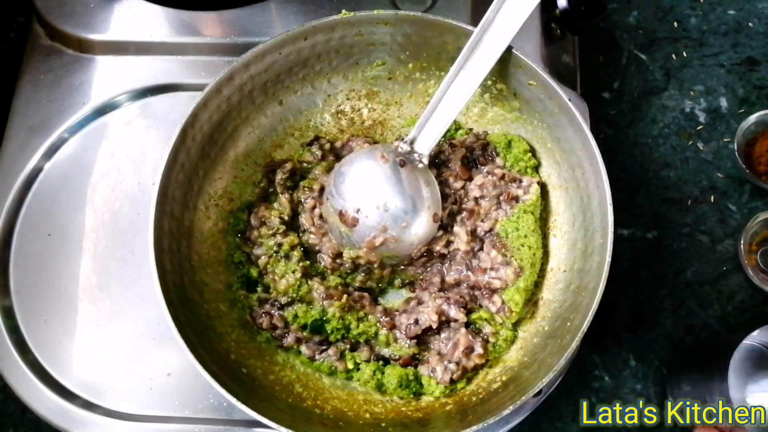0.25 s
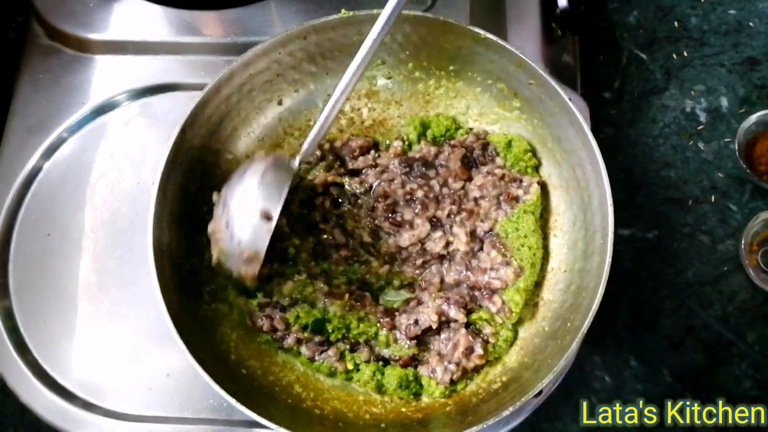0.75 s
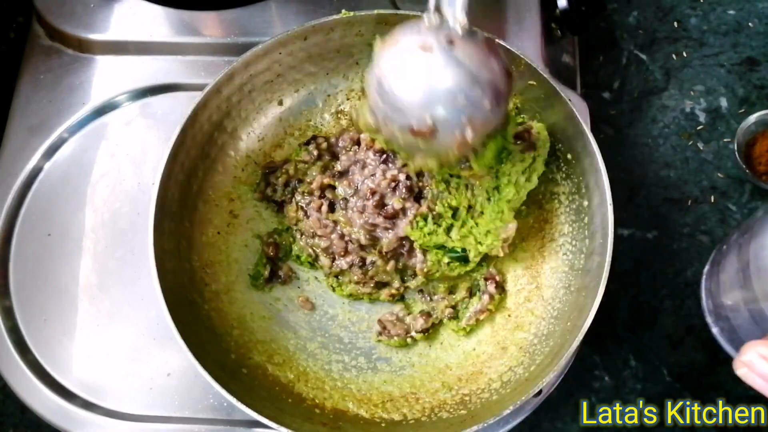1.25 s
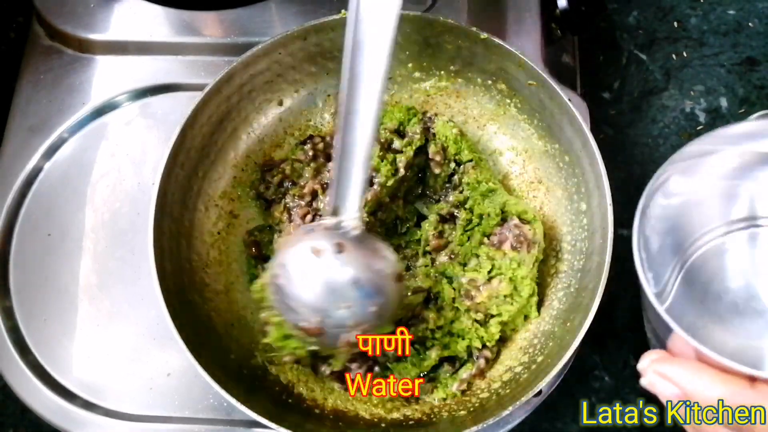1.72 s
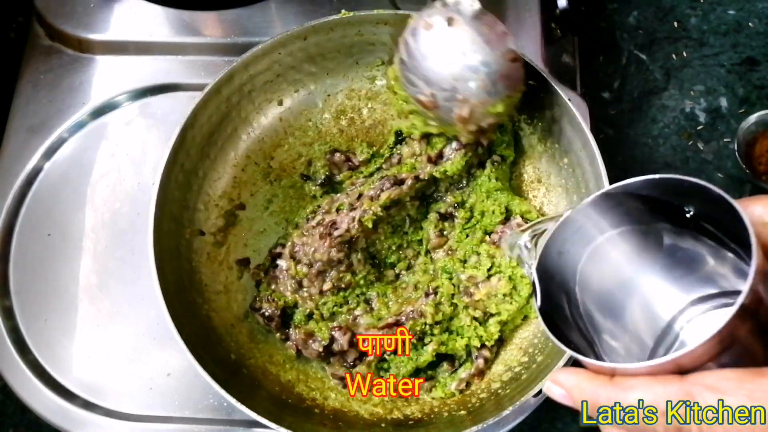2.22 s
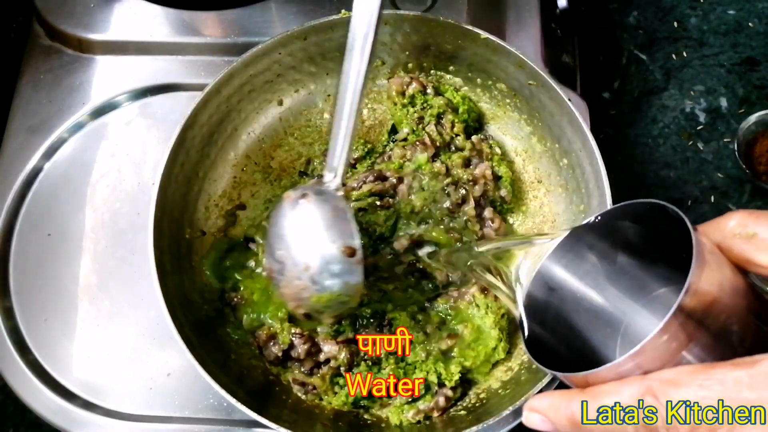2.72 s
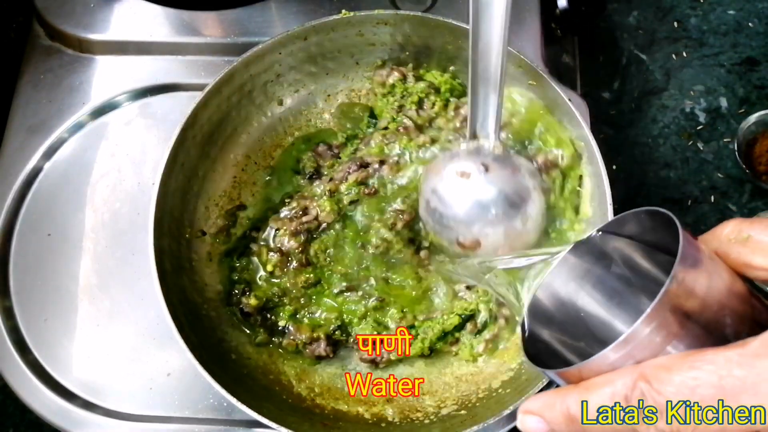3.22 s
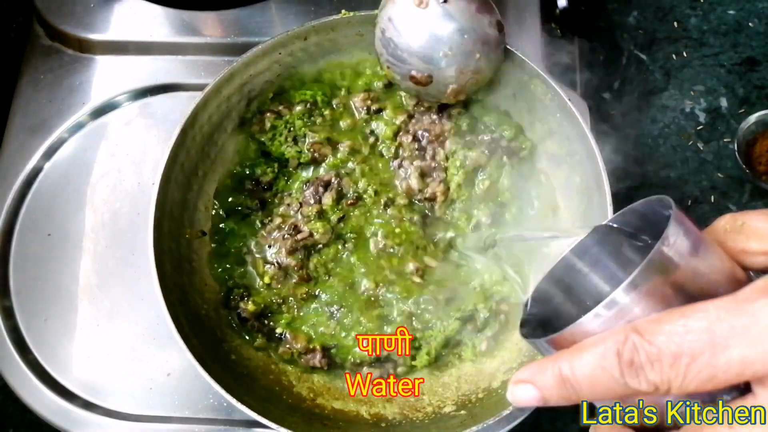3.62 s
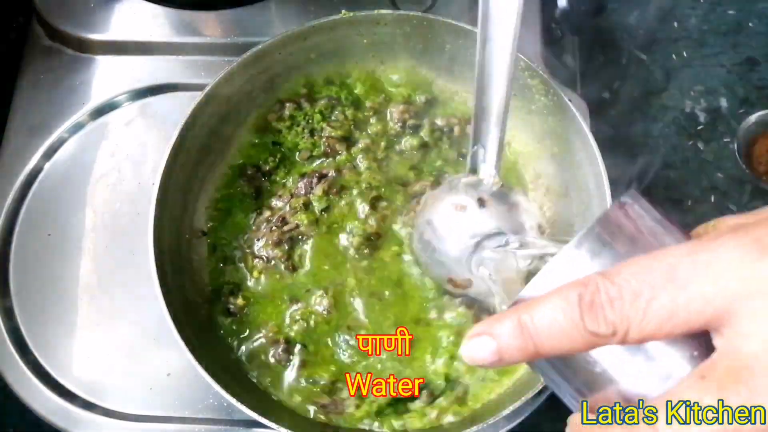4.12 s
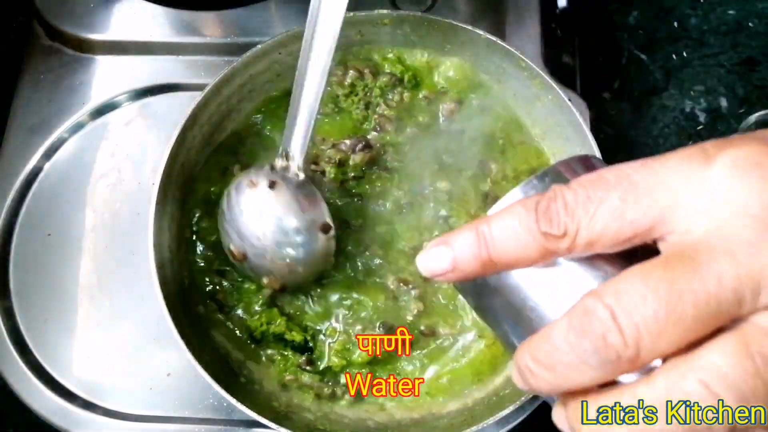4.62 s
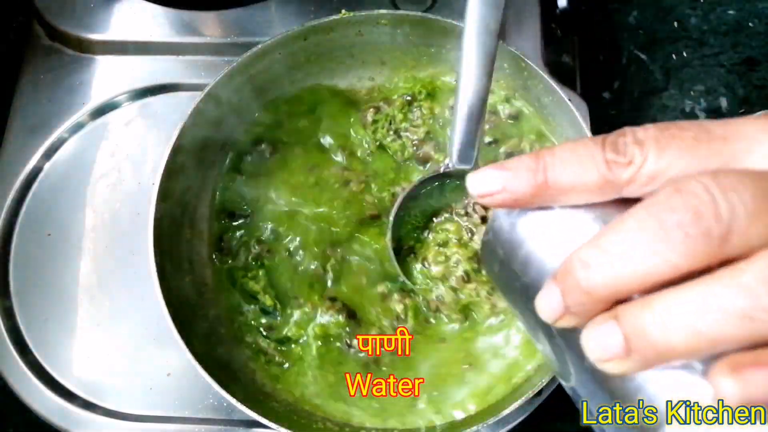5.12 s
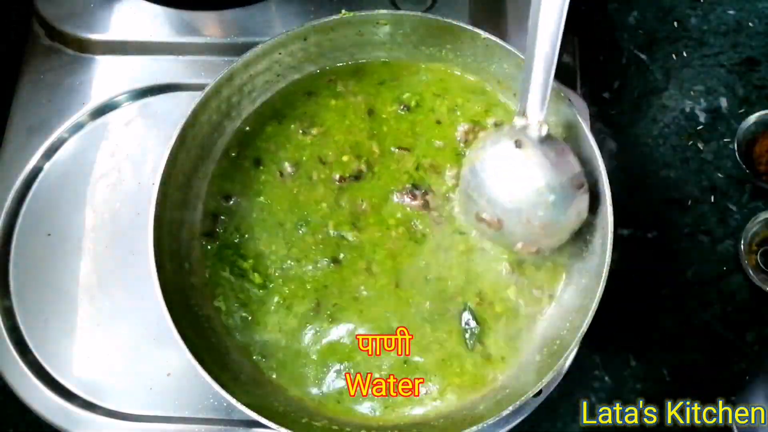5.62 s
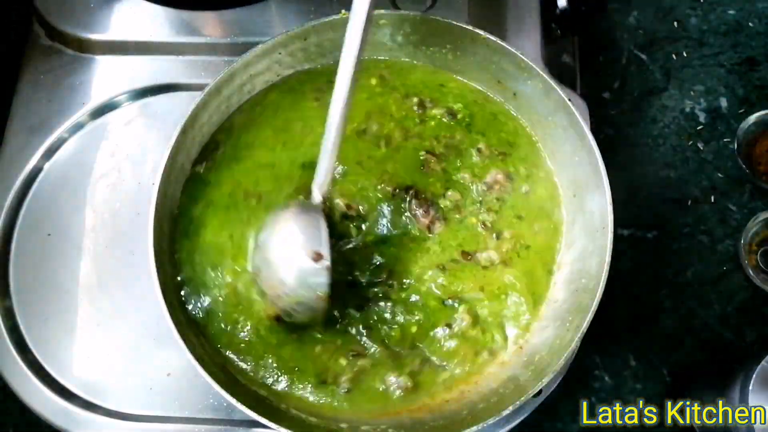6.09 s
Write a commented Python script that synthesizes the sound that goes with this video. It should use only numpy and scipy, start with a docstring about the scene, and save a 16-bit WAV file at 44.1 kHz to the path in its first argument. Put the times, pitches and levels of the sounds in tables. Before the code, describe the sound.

Food sizzles and spits in a metal pan over a low flame, then poured water makes the hiss surge and bubble, with a steel clang.

```python
"""Dal fries in a metal pan over a rumbling gas flame: filtered noise for the flame, random clicks for steam bursts.
From the start a ladle squelches through the paste and oil spits in short snaps; soon knocks ring the pan's
damped modes and pushes set it booming. From about 2.5 s water is poured in from a steel tumbler: bubbles boil
as decaying sines and seethe as the water spreads, and it smothers the steady fizz. Near 3.7 s air pockets plop
and steel clangs on steel, as fluttering modes over a noise crash; flares of fizz continue to the end."""
import sys
import numpy as np
from scipy import signal
from scipy.fft import rfft, irfft, next_fast_len
from scipy.io import wavfile

SR = 44100
rng = np.random.default_rng(int(sys.argv[2]) if len(sys.argv) > 2 else 0)


def master_out(mix):
    """Clip the mix to full scale and print it as 16-bit PCM to the path in sys.argv[1]."""
    frames = np.transpose(np.atleast_2d(mix))
    ceiling = np.clip(frames, -1, 1)
    pcm = np.round(ceiling * 32767).astype(np.int16)
    wavfile.write(sys.argv[1], SR, pcm)


N = 280023

# Relative spectrum of the gas flame's deep rumble and of its soft roar. Columns: f/Hz, level/dB
FLAME_LOW_SPECTRUM = [(12, -10), (22, -3), (33, 4), (48, -7), (61, -2), (80, -16), (130, -27.5)]
FLAME_ROAR_SPECTRUM = [(80, -8), (115, 2), (160, -4), (205, -17.5), (400, -33), (900, -59)]
ROAR_DB = -56
# Strength of the flame's rumble. Columns: t/s, level/dB
RUMBLE_LEVEL = [(0, -50.5), (1.35, -48.5), (1.6, -55), (2.3, -47.5), (2.8, -59), (3.4, -54), (4.8, -55.5),
                (5.6, -52), (6.35, -52)]
# Strength of a low hum that soon fades. Columns: t/s, level/dB
HUM_LEVEL = [(0, -55), (0.6, -57), (0.9, -58.5), (1.1, -84)]
HUM_HZ = 159   # mean pitch

# Relative spectrum of the fizz on each side. Columns: f/Hz, left level/dB, right level/dB
FIZZ_SPECTRUM = [(2100, -25, -23.5), (3180, -15.3, -14.5), (3550, -15.5, -17), (4530, -13, -10.5),
                 (5510, -9.5, -2), (6280, -6.5, 3.5), (6800, -3.5, -5.5), (7840, 1.5, -3),
                 (8300, 0.5, -10.5), (9940, -9, -8.5), (10680, -8, -11.5), (13200, -18, -11),
                 (14150, -11, -10.5), (15600, -21.5, -7)]
# Steam bursts at a middling fizz, sparse while only oil is frying. Columns: t/s, rate/(bursts per s)
BURST_RATE = [(0, 770), (0.6, 1270), (1.1, 3200), (2.2, 3300), (3.4, 4400), (4.6, 13000), (6.35, 12500)]
# Flares, when wet food or water reaches bare hot metal. Columns: t/s, fizz level/dB, rise/s,
# time the metal stays wet/s, then relative to the fizz: coarse droplets/dB, fine spray/dB, boiling/dB;
# last, left-right difference/dB
FRYING_FLARES = [(0.0, -32, 0.0039, 0.22, -5, -7, -14.5, -2.5),
                 (0.375, -34.5, 0.038, 0.049, 1, -16, -16, 2), (0.79, -34.5, 0.1, 0.13, 0, -8.5, -12, -1),
                 (1.0, -24, 0.15, 0.13, 2, -6.5, -19.5, 0),
                 (1.44, -27.5, 0.042, 0.17, -1.5, -7.5, -19.5, 2), (1.93, -25, 0.14, 1, -1.5, -8, -19.5, 1),
                 (2.595, -25, 0.05, 0.3, 5, -6, -20, 1.5), (3.1, -21.5, 0.058, 0.41, 6, -6, -14.5, 0.5),
                 (3.21, -17.5, 0.054, 0.45, -1, -15, -22, 1), (3.58, -22.5, 0.11, 0.15, 4.5, -12, -25, -4),
                 (3.93, -27, 0.088, 0.19, 4.5, -10.5, -10.5, -0.5),
                 (4.12, -21.5, 0.17, 0.23, 0, -9, -31, 1), (4.65, -33, 0.1, 0.15, 5.5, -9.5, -15.5, 0),
                 (5.086, -23, 0.14, 0.044, 2, -10, -19.5, 0.5),
                 (5.54, -35.5, 0.02, 0.046, 2.5, -12, -23, -5.5),
                 (5.85, -28, 0.13, 0.11, 3.5, -8.5, -17.5, 0),
                 (6.19, -26.5, 0.096, .1, -2.5, -12, -14.5, -0.5)]
# a flare sags while the metal is wet, then dies quickly as it dries
SAG_DB_PER_S, DRYING_DB_PER_S = 0.5, 40.5
# steady fizz between flares and steady simmer of larger bubbles, in bare oil and under water
OIL_FIZZ_DB, COVERED_FIZZ_DB = -32.5, -52
OIL_SIMMER_DB, COVERED_SIMMER_DB = -48.5, -51
# coarse droplets and fine spray of the steady frying, relative to its fizz
STEADY_COARSE_DB, STEADY_SPRAY_DB = 0.5, -9
# the water gradually covers the pan's floor between these moments
COVER_FROM_S, COVER_BY_S = 2.5, 4.4
# How hard the poured water churns and boils. Columns: t/s, level/dB
WATER_LEVEL = [(2.45, -69), (2.66, -38.5), (3.08, -46), (3.4, -34.5), (3.62, -33), (3.85, -32.5),
               (4.1, -40), (4.55, -37.5), (4.9, -46), (5.13, -55), (5.2, -44), (5.38, -43.5), (5.46, -67)]

# Relative spectrum of the boiling, with the pan's resonances standing out. Columns: f/Hz, level/dB
BOILING_SPECTRUM = [(350, -11), (620, -13.5), (840, 1), (980, -3), (1120, -2), (1280, -3), (1540, 0.5),
                    (1730, 5.5), (1930, -0.5), (2230, 4.5), (2650, -9), (4000, -5)]
# Relative spectrum of the squelching paste. Columns: f/Hz, level/dB
SQUELCH_SPECTRUM = [(150, 1.5), (220, -2.5), (300, 0.5), (400, -5), (550, 2.5), (750, -3.5), (1300, -19.5)]
# squelch under the moving ladle, relative to the water's churning, and relative to a knock
STIR_DB, GURGLE_DB, SMACK_DB = -59, -14, -17.5
SMACK_RISE_S, SMACK_DB_PER_S = 0.01, 70

# Oil spits, levels before the low cut. Columns: t/s, peak level/dB, left-right difference/dB, snap width/s
OIL_SPITS = [(0.0782, -13, -1, 0.00016), (0.1135, -11, -2, .00012), (0.131, -19, -1, 0.000044),
             (0.162, -18, 0, .00005), (0.1685, -20, 1, .00015), (0.1938, -0.5, 2, 0.00017),
             (0.2516, -9.5, -1, .00008), (0.3066, -5, 5, 0.00013), (0.3530, -10, 0, 0.000056),
             (0.423, -9, 4, 0.00015), (0.4592, -13.5, 3, 0.00016), (0.516, -14.5, 1, .00017),
             (0.5625, -13.5, 14, 0.00019), (0.944, -18, 6, .00006), (1.0055, -15, 9, 0.00017),
             (1.962, -11, -2, 0.00013), (2.0567, -21, -3, 0.000082), (2.7375, -7, 7, 0.00017),
             (2.9755, -14.5, 0, 0.0001), (3.105, -16, -1, .00012)]
SPRAY_TICK_S = 0.000083
# Pushes that rock the pan on its stand. Columns: t/s, level/dB
PAN_PUSHES = [(0.454, -38), (0.965, -40), (1.137, -34), (1.642, -40.5), (2.402, -43), (3.22, -34),
              (3.736, -27.5), (3.821, -43), (4.04, -31.5), (4.341, -33.5), (4.437, -32), (5.02, -45),
              (5.77, -35.5), (5.869, -34), (6.021, -32.5)]
BOOM_HZ, BOOM_T60_S = 94.2, 0.65
# Knocks of the ladle on the pan through the paste. Columns: t/s, level/dB
LADLE_KNOCKS = [(0.457, -34), (0.974, -36), (1.023, -30.5), (1.120, -31.5), (1.645, -34.5), (1.675, -41),
                (2.39, -38)]
# The pan's modes, damped by the dal. Columns: f/Hz, level relative to the knock/dB, t60/s
PAN_MODES = [(293, -15, 0.13), (410, -11, 0.043), (528, -39, 0.049), (810, -3, 0.012), (1270, -12, .03),
             (1720, -20, 0.018)]
# Short crackling spurts of steam. Columns: t/s, level/dB, length/s, centre f/Hz
STEAM_SPURTS = [(0.738, -30, 0.02, 6900), (2.052, -26, 0.021, 6850), (3.140, -22, .024, 5930),
                (3.160, -20.5, 0.019, 6260), (3.208, -19.5, 0.032, 5600), (3.258, -25, 0.021, 7240),
                (3.305, -17, 0.035, 7440), (4.156, -23, .014, 7000), (4.248, -18.5, 0.018, 6950),
                (4.278, -27, .018, 7200), (4.323, -18, 0.013, 7500), (4.350, -22, .02, 7400),
                (4.406, -20.5, 0.017, 7100), (4.435, -21, 0.032, 7750)]
# Scrapes of the ladle's edge on the pan. Columns: t/s, level/dB, length/s, centre f/Hz
LADLE_SCRAPES = [(0.865, -46, 0.14, 2040), (1.016, -40, 0.019, 1750), (1.93, -46, 0.4, 1490),
                 (3.345, -34, 0.073, 1750), (3.79, -34.5, 0.099, 1250), (5.14, -39.5, 0.21, 2040)]

# Relative spectrum of fine bubbles in the layer of water. Columns: f/Hz, level/dB
SEETHING_SPECTRUM = [(480, -4.5), (850, -6), (1050, -14), (1350, -2), (1580, -1), (1760, -5), (2000, -1),
                     (3000, -7.5), (5000, 4), (8000, -13)]
SEETHING_DB = -4.5   # relative to the boiling
# Plops of water. Columns: t/s, peak level/dB, f/Hz
WATER_PLOPS = [(3.674, -24, 1860), (3.8377, -14, 1310)]
PLOP_SWELL_S = .0009
# Steel touches steel, strikes it and skids. Columns: t/s, crash level/dB
STEEL_CLANGS = [(3.695, -15.5), (3.708, -15.5), (3.739, -25), (3.766, -25)]
# Modes of the steel before flutter. Columns: f/Hz, peak level/dB, swell time/s, t60/s, left-right difference/dB
STEEL_MODES = [(1753, -25.5, .050, .3, 4), (2250, -28.5, .008, .13, 0), (2923, -36, .03, .2, 0),
               (4415, -30, .02, .3, -4), (5217, -16, .05, .24, -6), (6110, -18.5, .005, .28, -8),
               (7075, -14.5, .022, .55, -7), (7644, -16.5, .006, .24, 9), (8110, -20, .006, .27, 10),
               (9215, -15.5, .010, .19, 4), (9620, -25, .035, .2, 5), (10017, -23.5, .012, .27, 5),
               (10405, -24, .045, .22, 3), (10471, -25, .02, .22, 3), (11620, -28, .03, .14, -4),
               (12385, -24.5, .028, .15, -1), (12610, -26, .015, .12, -2), (12973, -27, .03, .18, -4),
               (13193, -26, .008, .2, -4), (14099, -25.5, .02, .18, -8), (15073, -28, .06, .08, -6)]
SKID_FROM_S = 3.707   # the modes are pumped from the main strike on
CUTOFF_HZ = 15700


def from_db(db):
    """Amplitude ratio of a level in decibels."""
    return 10 ** (np.asarray(db) / 20)


def power_sum(*levels_db):
    """Incoherent addition: the powers of independent sounds add."""
    return 10 * np.log10(sum(10 ** (db / 10) for db in levels_db))


def rms_one(x):
    """Normalisation to unit root-mean-square amplitude."""
    return x / np.sqrt(np.mean(x ** 2) + 1e-20)


def in_time(rows):
    """Linear interpolation of each column of a curve, sample by sample."""
    s, *columns = np.transpose(rows)
    return [np.interp(np.arange(N) / SR, s, c) for c in columns]


def drift(rate, size=N):
    """Low-passed random fluctuation of unit spread, with its corner near `rate` in Hz."""
    # a double pole, run at one value per 40 samples
    r = np.exp(-80 * np.pi * rate / SR)
    steps = rng.standard_normal(size // 40 + 2002)
    slow = signal.lfilter([1], [1, -2 * r, r * r], steps)[2000:]   # skip the onset
    return np.interp(np.arange(size) / 40, np.arange(len(slow)), rms_one(slow))


def swell(s, rise_s, hold_s, sag, release):
    """Envelope in dB: a linear rise in amplitude, a sagging hold, then a release (both in dB per s)."""
    t = np.arange(N) / SR - s
    held = np.maximum(t - rise_s, 0)
    rise = np.clip(t / rise_s, 1e-6, 1)
    return 20 * np.log10(rise) - sag * np.minimum(held, hold_s) - release * np.maximum(held - hold_s, 0)


def place(s, sound):
    """Delay: a short sound set at its moment."""
    out, at = np.zeros(N), round(s * SR)
    out[at:at + len(sound)] = sound[:N - at]
    return out


def grains(per_s, spread_db):
    """Random (Poisson-like) clicks of either sign, with an exponential spread of level in dB."""
    out, at = np.zeros(N), np.flatnonzero(rng.random(N) < per_s / SR)
    depth = rng.exponential(1, N)[at]
    sign = rng.choice([-1, 1], N)[at]
    out[at] = sign * from_db(spread_db * np.minimum(depth, 5))
    return out


def stereo_noise(alike):
    """Partly correlated white noise: the power share `alike` is common to both sides."""
    alike = np.clip(alike, 0, 1)
    common = rng.standard_normal(N)
    separate = rng.standard_normal((2, N))
    return np.sqrt(alike) * common + np.sqrt(1 - alike) * separate


def colour(x, spectrum):
    """Spectral shaping by rows of f/Hz and one or two levels/dB; 12 dB per octave fall below the first."""
    size = next_fast_len(N + SR // 4)
    hz = np.maximum(np.arange(size // 2 + 1) * SR / size, 1)
    points, *columns = np.transpose(spectrum)
    gain = from_db([np.interp(np.log(hz), np.log(points), c) for c in columns])
    gain = gain * np.minimum(hz / points[0], 1) ** 2
    return irfft(rfft(x, size) * gain, size)[:, :N]


def ring(clicks, hz, t60):
    """Two-pole resonator: a unit click excites a decaying sine of initial height 1."""
    r, w = from_db(-60 / (t60 * SR)), 2 * np.pi * hz / SR
    return signal.lfilter([0, np.sin(w)], [1, -2 * r * np.cos(w), r * r], clicks + 1e-18)


def bowl(x, scatter_db, t60):
    """Diffuse scattering: the pan's walls add a short decaying tail, different on each side."""
    t = np.arange(SR // 8) / SR
    tail = rng.standard_normal((2, len(t))) * from_db(-60 * t / t60)
    tail /= np.sqrt(np.sum(tail ** 2, axis=1, keepdims=True))
    scattered = signal.fftconvolve(np.atleast_2d(x), tail, axes=1)[:, :N]
    return x + from_db(scatter_db) * scattered


def stove():
    """Combustion noise: the flame's deep rumble and steady soft roar, with a wavering tonal hum."""
    rumble_db, = in_time(RUMBLE_LEVEL)
    hum_db, = in_time(HUM_LEVEL)
    hum_pitch = HUM_HZ + 3 * drift(4.6)
    hum = np.sqrt(2) * np.sin(2 * np.pi * np.cumsum(hum_pitch) / SR)
    rumble = from_db(rumble_db) * rms_one(colour(stereo_noise(alike=0.96), FLAME_LOW_SPECTRUM))
    roar = from_db(ROAR_DB) * rms_one(colour(stereo_noise(alike=0.98), FLAME_ROAR_SPECTRUM))
    return rumble + roar + from_db(hum_db + 2.0 * drift(3.8)) * hum


def water_cover():
    """Spreading layer: the share of the pan's floor under water grows linearly."""
    return np.clip((np.arange(N) / SR - COVER_FROM_S) / (COVER_BY_S - COVER_FROM_S), 0, 1)


def frying_levels(water_db):
    """Power balance of flares and steady frying, whose fizz the water smothers as it spreads.

    Returns the levels of fizz, coarse droplets, fine spray and boiling, and the left-right difference, in dB.
    """
    cover = water_cover()
    steady_db = OIL_FIZZ_DB + cover * (COVERED_FIZZ_DB - OIL_FIZZ_DB)
    simmer_db = OIL_SIMMER_DB + cover * (COVERED_SIMMER_DB - OIL_SIMMER_DB)
    flares_db = [db + swell(s, rise_s, wet_s, SAG_DB_PER_S, DRYING_DB_PER_S)
                 for s, db, rise_s, wet_s, *_ in FRYING_FLARES]
    powers = from_db(flares_db) ** 2
    *_, coarse, sprays, boils, pans = np.transpose(FRYING_FLARES)
    shares = from_db([np.zeros(len(FRYING_FLARES)), coarse, sprays, boils]) ** 2
    fizz_db, coarse_db, spray_db, boil_db = 10 * np.log10(shares @ powers)
    # the steady frying is centred, so it dilutes the flares' balance
    pan_db = pans @ powers / (powers.sum(axis=0) + from_db(steady_db) ** 2)
    return (power_sum(steady_db, fizz_db),
            power_sum(steady_db + STEADY_COARSE_DB, coarse_db),
            power_sum(steady_db + STEADY_SPRAY_DB, spray_db),
            power_sum(simmer_db, water_db, boil_db),
            pan_db)


def fizz(fizz_db, coarse_db, spray_db):
    """Impulsive steam noise: the harder the frying, the denser the bursts, merging into a hiss."""
    per_s = in_time(BURST_RATE)[0] * from_db(.5 * (fizz_db + 30.0) + 1.9 * drift(25))
    left = rms_one(grains(per_s, spread_db=2.0) / np.sqrt(per_s))
    # bursts come from all over the pan, so each reaches the right side with a lag of its own
    at, right = np.flatnonzero(left), np.zeros(N)
    lag = rng.integers(-30, 31, N)[at]
    right[(at + lag) % N] = left[at]
    hiss = np.array([left, right]) + from_db(-0.5) * stereo_noise(alike=0.016)
    hiss = bowl(hiss, scatter_db=-6.5, t60=0.066)
    hiss = rms_one(colour(hiss, FIZZ_SPECTRUM)) * from_db(0.46 * drift(40))
    # three bands: coarse, medium and the finest droplets; the first two also flutter on their own
    coarse = colour(hiss, [(1, 0), (4000, 0), (5200, -14), (6500, -35)])
    body = colour(hiss, [(1, 0), (9000, 0), (11000, -14), (13000, -35)])
    medium, fine = body - coarse, hiss - body
    coarse_flutter_db, medium_flutter_db = 2.1 * drift(15), 0.35 * drift(31)
    return (from_db(coarse_db + 2.5 + coarse_flutter_db) * coarse
            + from_db(fizz_db + 0.98 + medium_flutter_db) * medium
            + from_db(spray_db + 8.5) * fine)


def boil(boil_db):
    """Bubble resonance: larger bubbles ring for a few cycles each over a seething wash."""
    pitches = np.geomspace(650, 3400, num=24)
    bubbles = sum(ring(grains(80, spread_db=2.5), hz, 16 / hz) * np.sqrt(hz) for hz in pitches)
    wash = rms_one(bowl(bubbles, scatter_db=1.0, t60=0.11)) + from_db(2.3) * stereo_noise(alike=0.15)
    return from_db(boil_db - 0.65 + 0.58 * drift(13.0)) * rms_one(colour(wash, BOILING_SPECTRUM))


def squelch(water_db):
    """Viscous tearing: paste smacks under the ladle, with a surge at each knock, and under the stream."""
    digs = [db + SMACK_DB + swell(s, SMACK_RISE_S, 0, 0, SMACK_DB_PER_S) for s, db in LADLE_KNOCKS]
    stir_db = power_sum(STIR_DB, water_db + GURGLE_DB, *digs)
    smacks = rms_one(grains(600, spread_db=1.0)) + stereo_noise(alike=0.43)
    return from_db(stir_db) * rms_one(colour(smacks, SQUELCH_SPECTRUM))


def spits(ring_hz, spray_hz, spray_db, low_cut_hz):
    """Transient droplet burst: a Gaussian-windowed snap of a few cycles with a tick of spray on top."""
    t = np.arange(SR // 500) / SR
    out = np.zeros((2, N))
    for s, db, pan, width_s in OIL_SPITS:
        late = t - 2 * width_s   # time from the snap's peak
        snap = np.exp(-(late / width_s) ** 2) * np.sin(2 * np.pi * ring_hz * late)
        tick = np.exp(-(late / SPRAY_TICK_S) ** 2) * np.sin(2 * np.pi * spray_hz * late)
        snap += from_db(spray_db) * tick
        at = round(s * SR)
        out[:, at:at + len(t)] += snap * from_db(db + np.array([[pan], [-pan]]) / 2)
    low_cut = signal.butter(4, low_cut_hz, "high", fs=SR, output="sos")
    thin = signal.sosfilt(low_cut, out + 1e-18)
    heard = np.array([thin[0], np.roll(thin[1], 1)])   # the right side hears it one sample later
    return bowl(heard, scatter_db=-7, t60=0.013)


def boom(push_s):
    """Forced, then free vibration: each push builds up the pan's low rocking mode, which dies away."""
    t = np.arange(SR) / SR
    envelope = (1 - np.exp(-t / push_s)) * from_db(-60 * t / BOOM_T60_S)
    swing = envelope * np.sin(2 * np.pi * BOOM_HZ * t)
    return sum(place(s, from_db(db) * swing) for s, db in PAN_PUSHES)


def knocks():
    """Modal excitation: each knock strikes the pan's damped modes with strengths of its own."""
    at = [round(s * SR) for s, _ in LADLE_KNOCKS]
    levels = np.array(LADLE_KNOCKS)[:, 1]
    own_db = rng.normal(0, 2.8, (len(LADLE_KNOCKS), len(PAN_MODES)))
    out = np.zeros(N)
    for (hz, mode_db, t60), own in zip(PAN_MODES, own_db.T):
        clicks = np.zeros(N)
        clicks[at] = from_db(levels + mode_db + own)
        out += ring(clicks, hz, t60)
    return out


def sing(s, length_s, db, hz):
    """Frictional tone: the ladle sings faintly as it slides up the wall of the pan."""
    t = np.arange(round(length_s * SR)) / SR
    return place(s, from_db(db) * np.hanning(len(t)) ** .5 * np.sin(2 * np.pi * hz * t))


def puffs(rows, octaves, per_s):
    """Band-limited crackle: brief swells of steam or scraping, each around its own centre frequency."""
    clicks = rms_one(grains(per_s, spread_db=3.0))
    crackle = bowl(clicks, scatter_db=-4, t60=0.051) + from_db(-3) * stereo_noise(alike=0.18)
    out = np.zeros((2, N))
    for s, db, length, hz in rows:
        at, size = round(s * SR), round(length * SR)
        edges_hz = hz * 2 ** (np.array([-.5, .5]) * octaves)
        band = signal.butter(2, edges_hz, "band", fs=SR, output="sos")
        puff = rms_one(signal.sosfilt(band, crackle[:, at:at + size]))
        out[:, at:at + size] += from_db(db) * np.hanning(size) * puff
    return out


def seethe(boil_db):
    """Superposed bubble bursts: where water covers the pan, fine bubbles follow the boiling level."""
    clicks = grains(3000, spread_db=0.5)
    bursts = rms_one(bowl(clicks, scatter_db=3.5, t60=0.086)) + stereo_noise(alike=0.14)
    return water_cover() * from_db(boil_db + SEETHING_DB) * rms_one(colour(bursts, SEETHING_SPECTRUM))


def plops():
    """Cavity collapse: air pockets under the stream give a few swelling cycles and a short tail."""
    t = np.arange(SR // 50) / SR
    envelope = (t / PLOP_SWELL_S) ** 2 * np.exp(2 - 2 * t / PLOP_SWELL_S)
    out = sum(place(s, from_db(db) * envelope * np.sin(2 * np.pi * hz * t)) for s, db, hz in WATER_PLOPS)
    return bowl(out, scatter_db=-10, t60=.04)


def clang(crash_t60):
    """Impact and friction: a bright crash; skidding steel pumps up each mode, which then rings out."""
    t = np.arange(SR) / SR
    modes = np.zeros((2, SR))
    for hz, peak_db, swell_s, t60, pan_db in STEEL_MODES:
        decay_db = peak_db - 60 * np.maximum(t - swell_s, 0) / t60
        level = np.minimum(t / swell_s, 1) ** .6 * from_db(decay_db)
        for side in range(2):
            # the rubbing contact makes each mode flutter in pitch and strength
            phase = 2 * np.pi * hz * t + side * rng.uniform(-1.6, 1.6) + 0.27 * drift(48, size=SR)
            flutter_db = 2 * drift(31.0, size=SR) + 0.7
            modes[side] += level * np.sin(phase) * from_db(flutter_db + (.5 - side) * pan_db)
    ringing = np.array([place(SKID_FROM_S, side) for side in modes])
    fade = sum(place(s, from_db(db - 60 * t / crash_t60)) for s, db in STEEL_CLANGS)
    crash = colour(stereo_noise(alike=0.21), [(100, -13), (300, -2.0), (1000, -11), (2000, 7.0), (3500, -5.0),
                                              (6000, 8.5), (8500, 4.5), (11500, 2.5), (15500, 1)])
    return ringing + fade * rms_one(crash)


def scene():
    """Linear superposition of the frying, the water, the ladle and the stove."""
    water_db, = in_time(WATER_LEVEL)
    fizz_db, coarse_db, spray_db, boil_db, pan_db = frying_levels(water_db)
    steam = fizz(fizz_db, coarse_db, spray_db) + puffs(STEAM_SPURTS, octaves=0.34, per_s=7400)
    steam = steam * from_db([pan_db / 2, -pan_db / 2])
    frying = steam + spits(ring_hz=7530, spray_hz=13200, spray_db=-14, low_cut_hz=4900)
    water = boil(boil_db) + seethe(boil_db) + plops()
    scrapes = puffs(LADLE_SCRAPES, octaves=0.43, per_s=1200)
    scrapes = scrapes + sing(s=0.6, length_s=0.23, db=-57, hz=530)
    ladle = squelch(water_db) + scrapes + knocks() + boom(push_s=0.045) + clang(crash_t60=0.16)
    return frying + water + ladle + stove()


def record(dry):
    """Overload and band limit: peaks beyond full scale are clipped, then a steep low-pass cuts the top."""
    low_pass = signal.ellip(12, .1, 80, CUTOFF_HZ, fs=SR, output="sos")
    return signal.sosfilt(low_pass, np.clip(dry, -1, 1))


dry = scene()
out = record(dry)
master_out(out)
```